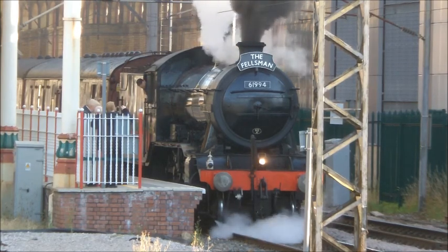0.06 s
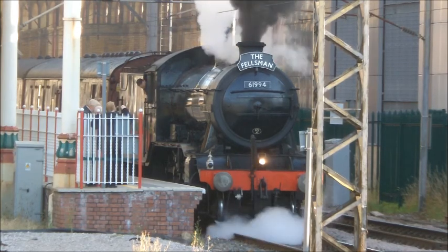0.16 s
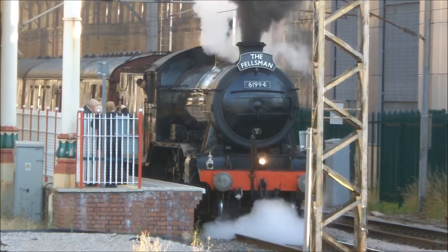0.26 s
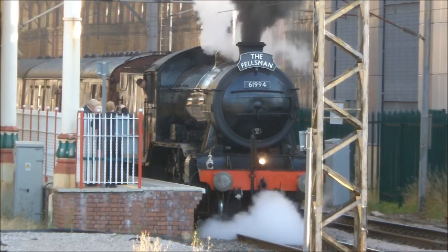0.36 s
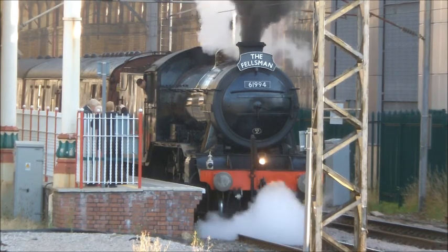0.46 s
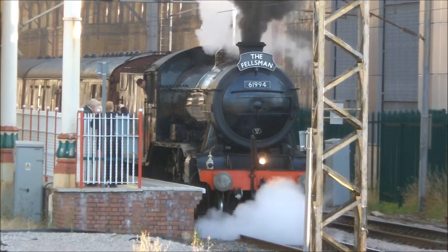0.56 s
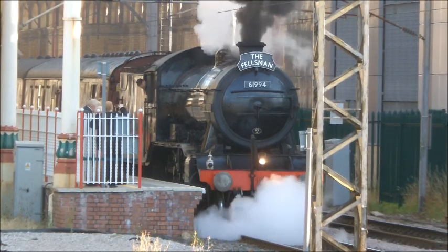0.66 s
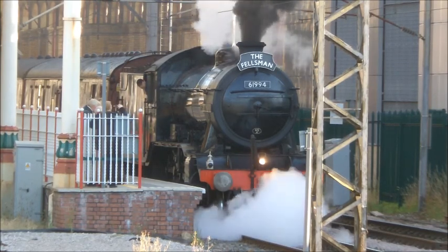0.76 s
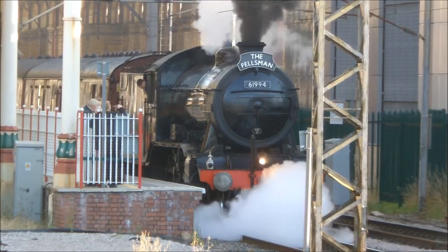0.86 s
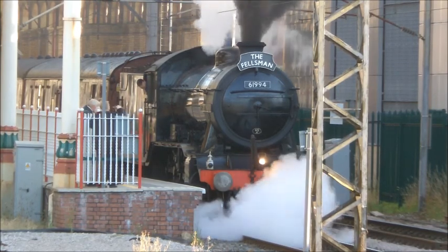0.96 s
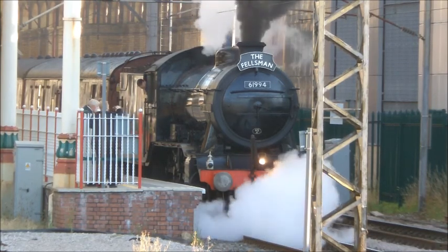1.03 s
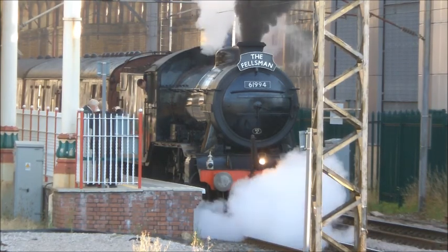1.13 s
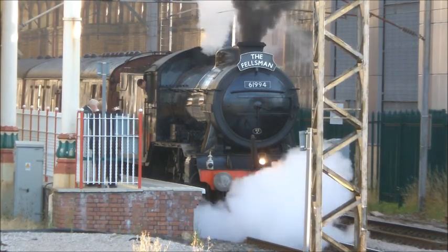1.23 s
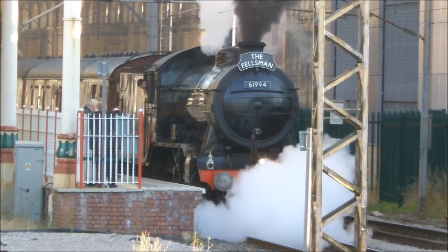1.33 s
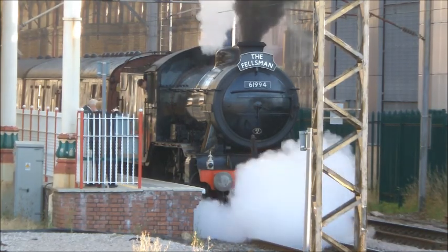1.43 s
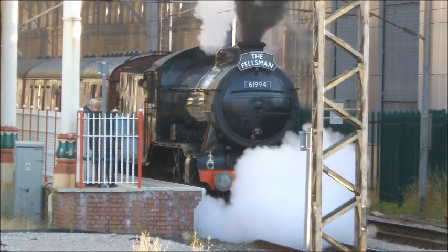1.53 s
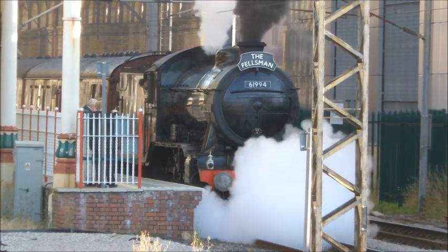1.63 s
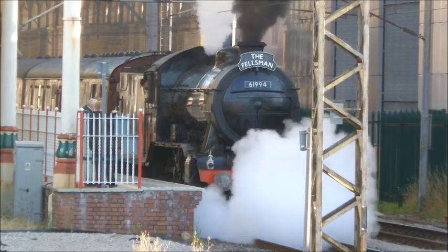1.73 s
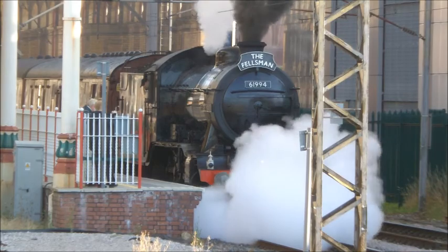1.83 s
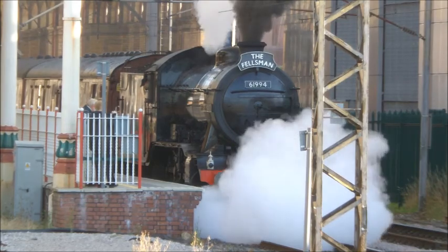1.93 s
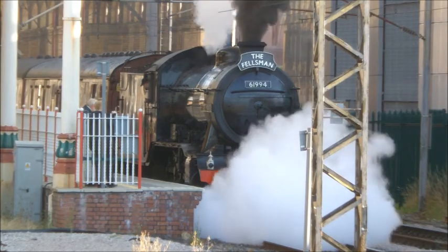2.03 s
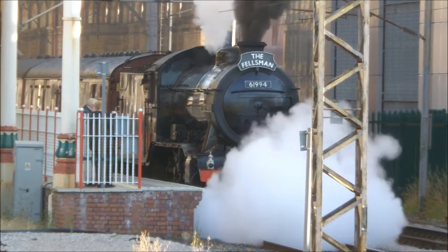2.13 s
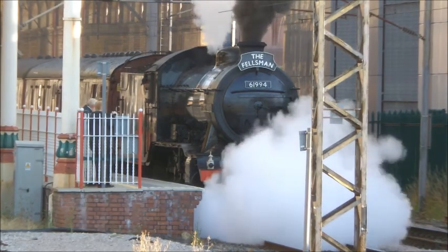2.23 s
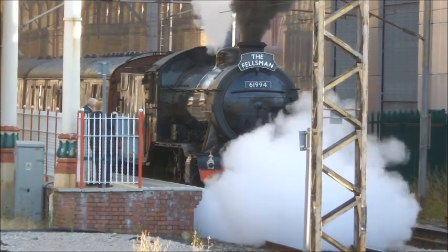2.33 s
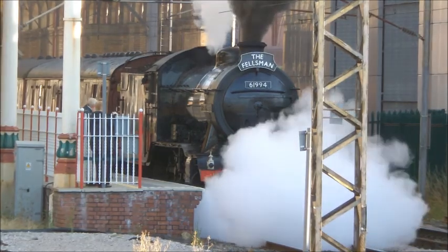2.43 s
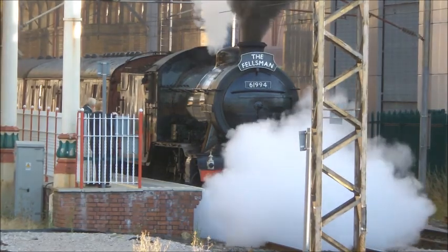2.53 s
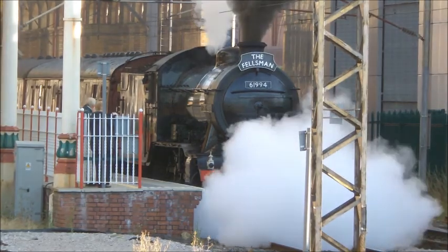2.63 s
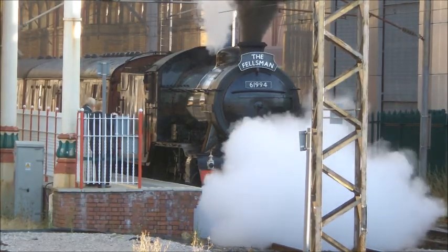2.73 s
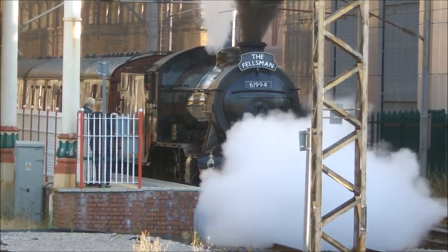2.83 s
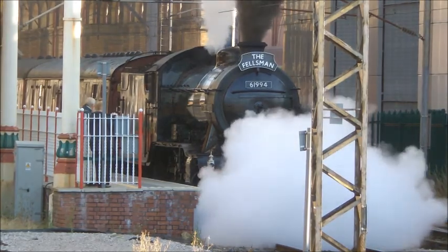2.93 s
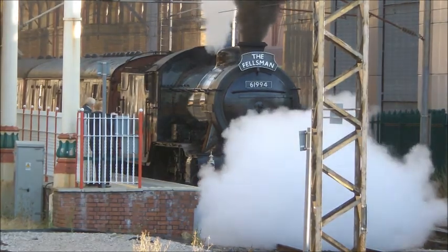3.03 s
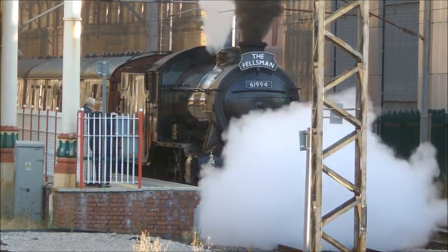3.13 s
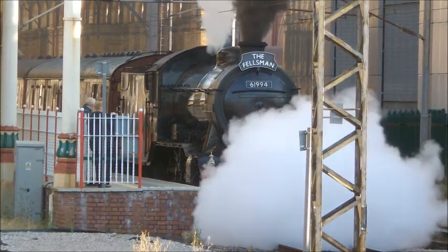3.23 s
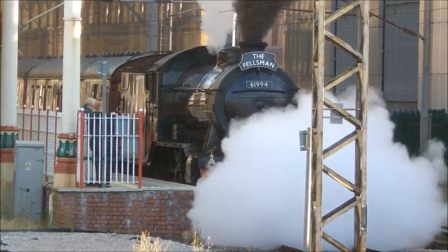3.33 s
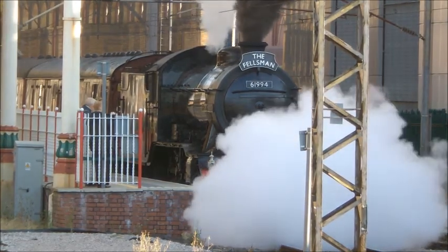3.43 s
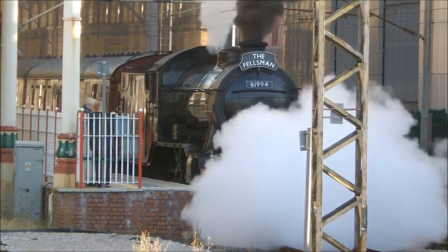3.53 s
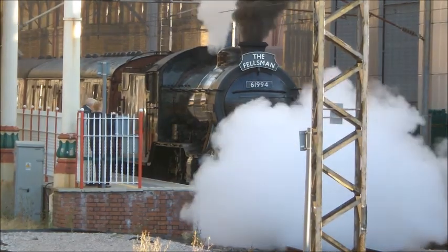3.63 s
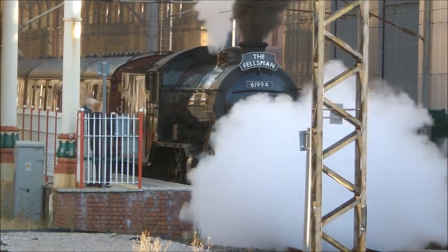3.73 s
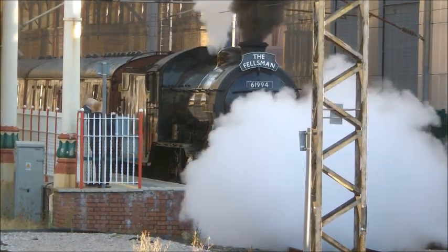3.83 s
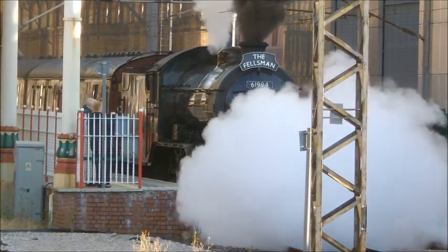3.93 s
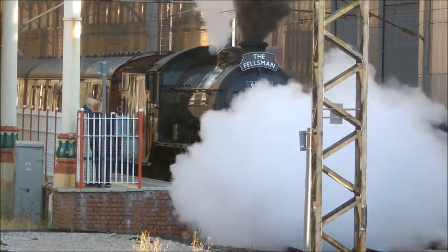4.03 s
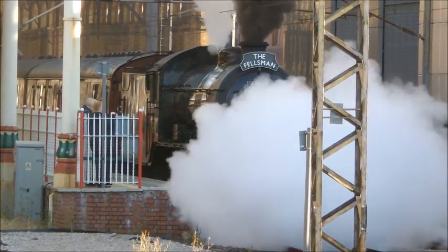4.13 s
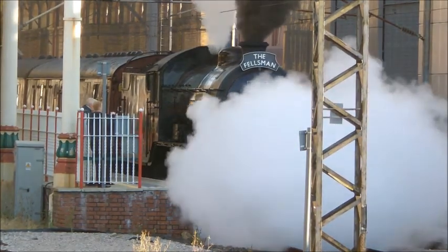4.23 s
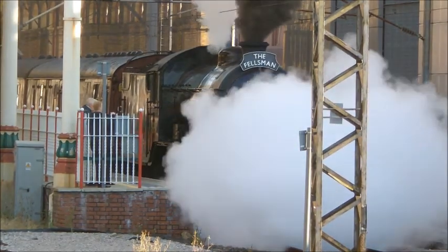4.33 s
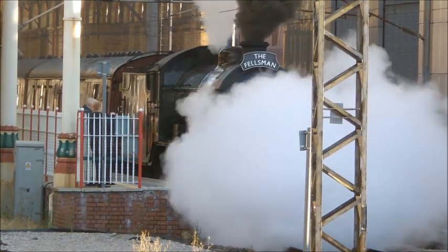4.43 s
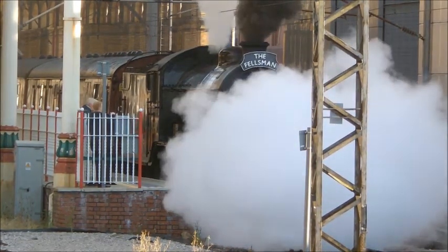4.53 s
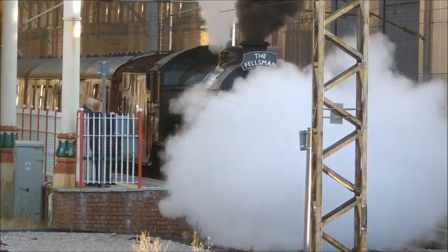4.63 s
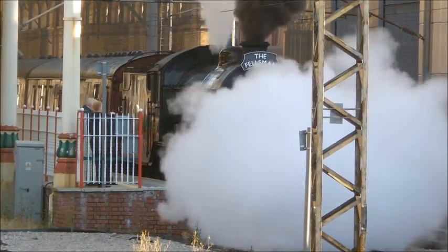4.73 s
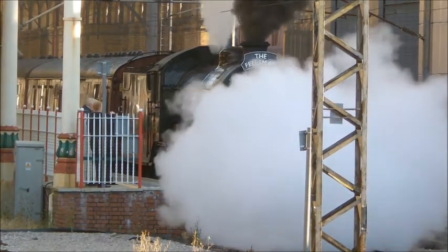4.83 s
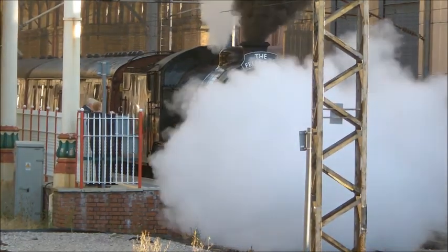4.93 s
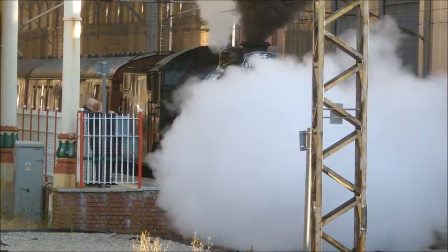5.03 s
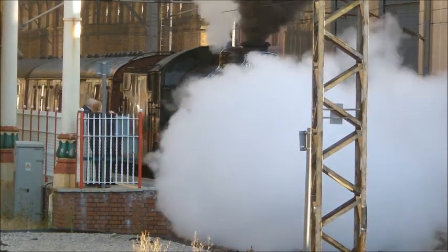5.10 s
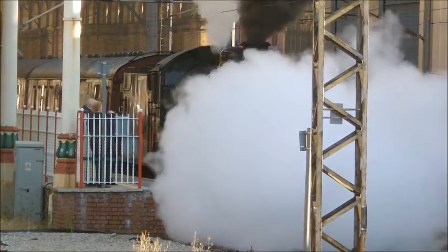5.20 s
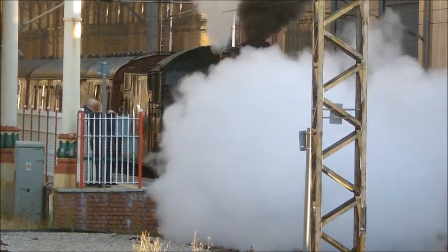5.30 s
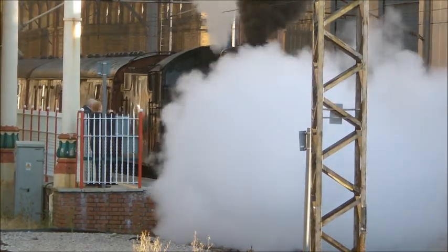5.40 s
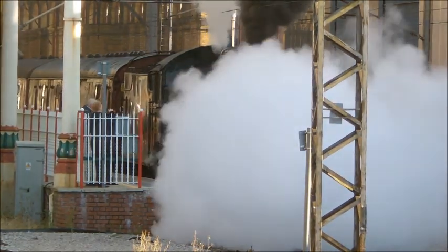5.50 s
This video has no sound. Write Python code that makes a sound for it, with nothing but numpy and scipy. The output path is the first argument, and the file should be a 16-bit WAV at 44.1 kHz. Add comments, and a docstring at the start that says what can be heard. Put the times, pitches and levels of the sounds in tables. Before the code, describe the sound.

Outdoors at a station platform, a standing steam locomotive some way off releases steam from its drain cocks. At 0 s there is a restrained, low breathy roar, easing slightly around 0.3 s. From about 0.6 s it swells fast, strong by 1.2 s and nearly full by 2 s, becoming a dense, bright, turbulent hiss. A very brief extra spit of treble flares near 2.6 s. The hiss continues to 5.5 s, gently surging, with its loudest push around 4.6 s, and does not stop. Faint whistly ridges and shifting hollow colour come from short echoes off brick and ballast. The image narrows during the swell, then opens wider after about 3 s. Beneath, almost masked, are light lumpy wind, slightly stronger late, and two soft low knocks near 3.7 s, a little to the right. The stereo microphone stays fixed, with the extreme top rolled off.

```python
"""A station platform: some way off, a standing steam locomotive opens its cylinder drain cocks.
The jets are stereo noise in seven bands, swelling from a low roar to a loud bright hiss.
Short echoes off ballast and brick comb it; its colour shifts and its width narrows, then opens again.
Beneath lie light wind, made of lumpy low noise, and two soft knocks, made of brief low swings."""
import sys
import numpy as np
from scipy import signal
from scipy.fft import rfft, irfft, next_fast_len
from scipy.io import wavfile

SR = 44100
rng = np.random.default_rng(int(sys.argv[2]) if len(sys.argv) > 2 else 0)


def log_audio(samples):
    """Write samples as a 16-bit WAV file to the path given in sys.argv[1]."""
    # one column per channel
    frames = np.atleast_2d(samples).T
    # limit to full scale, then quantise
    limited = np.clip(frames, -1, 1)
    pcm = np.round(limited * 32767).astype(np.int16)
    wavfile.write(sys.argv[1], SR, pcm)


N = 245195
SIZE = next_fast_len(N)
BIN_HZ = np.maximum(np.arange(SIZE // 2 + 1) * SR / SIZE, 1)
TIME_S = np.arange(N) / SR

# Basic colour of the steam, before resonances and part levels: pitch_hz, density_db (dB per Hz, relative)
STEAM_COLOUR = [(88, -62), (150, -41.5), (247, -36), (406, -28.5), (541, -25), (631, -18), (764, -18.5),
                (1330, -10), (2150, -3.5), (2710, -4.5), (4050, 0), (7910, -7.5), (9760, -2.5), (13300, 15),
                (14600, 15.5)]
# Resonances under the frames: pitch_hz, width_hz, boost_db
FRAME_RESONANCES = [(333, 56, 8), (406.5, 48, 8), (710, 160, 1.5), (1048, 160, 2.5), (1370, 76, 2),
                    (2360, 150, 0), (4100, 40, 1.5), (9050, 3000, 7)]
# Reflections off ballast and brick: delay_s, wander_s, level_db
ECHO_PATHS = [(.0019, 0.000054, -39.5), (.0043, 0.00011, -24), (.0065, 0.00021, -20),
              (.011, 0.000295, -16.5), (.017, 0.0003, -14)]
# Ridges in the hiss: start_s, end_s, pitch_hz, width_hz, gain_db (below zero a dip; flicker is added)
HISS_RIDGES = [(0, 1.1, 694, 200, 3.5), (0, 3.9, 1830, 140, 3.5), (0, 3.1, 3080, 170, -4),
               (0.4, 2.2, 2170, 130, 5), (0.5, 1.9, 4380, 400, 2), (1.3, 3.1, 5040, 260, 3.5),
               (1.4, 2.4, 4800, 230, -1), (1.5, 2.3, 4420, 310, 4.5), (1.7, 2.9, 12000, 800, 4),
               (2.399, 3.5, 9500, 900, 2.5), (2.55, 3.1, 2220, 300, 4), (3.4, 4.5, 7300, 900, 3.5),
               (3.5, 5, 2910, 86.6, 4.5), (4.002, 8, 1380, 130, 3), (4, 4.7, 1660, 50, 6.5),
               (4, 4.8, 3340, 130, 5.5), (4.4, 8.1, 9850, 300, 4.5), (4.5, 5.3, 12600, 700, 3.5),
               (4.9, 5.3, 1093, 500, 3), (4.9, 5.9, 4020, 300, 3.5)]
# Basic stereo width, before its change over time: pitch_hz, side_minus_mid_db
STEREO_WIDTH = [(100, -14), (300, -38), (500, -31), (1000, -19), (1900, -20), (3200, -10), (5000, -13),
                (7000, -2), (9200, -7.5), (11500, -8.5), (14000, -5.5)]
# Crossovers between neighbouring parts of the steam: pitch_hz
PART_EDGES_HZ = [1300, 2600, 4000, 6000, 8100, 10500]
# Rumble, roar, low core, high core, edge, sizzle, top: level_db (at reference flow and treble),
# flow_share (ratio), treble_share (ratio), creep_db_per_s
STEAM_PARTS = [(-51, .35, .05, 0.4), (-41.5, 0.67, 0.041, 0.04), (-39.5, 0.93, .01, 0.04),
               (-37, 1.07, .01, -0.2), (-46, 0.97, 0.38, 0.9), (-42.5, 1.07, 0.93, -0.76),
               (-42, 1.04, 1, 0.4)]
# Swing of the jets, scaled by each part's shares: time_s, core_level_db, treble_above_core_db
JET_FLOW = [(0.0, -50, -7), (0.26, -53.5, -6), (0.62, -50, -6.5), (0.9, -44.5, -6), (1.18, -39, -6.5),
            (1.38, -38.5, -9), (1.64, -36.5, -7.5), (1.8, -35.5, -9), (2.2, -35, -8), (2.5, -34, -6),
            (2.85, -33.5, -5.5), (3.08, -32, -7), (3.3, -33.5, -8), (3.7, -34, -9), (4.21, -33, -7),
            (4.55, -30, -9.5), (4.72, -30, -7), (4.88, -32, -8.5), (5.08, -31, -7), (5.4, -32.5, -4.5),
            (5.56, -31.5, -5.5)]
# Brief treble flares, scaled by each part's treble share: centre_s, half_length_s, lift_db
TREBLE_SPITS = [(1.15, .1, 0.5), (2.575, 0.044, 7), (2.74, 0.039, 1.5)]
# Change of stereo width, scaled by each part's width share: time_s, side_gain_db
WIDTH_OVER_TIME = [(0, 2), (.7, -8), (1.5, -6), (2.7, -6.5), (3.2, -0.5), (3.8, 2), (5.56, 1)]
# How much of the width change each part takes, rumble to top: width_share (ratio)
WIDTH_SHARES = [0.1, 0.56, 0.068, 0.33, .2, 0.63, 2.5]
# Colour of the wind, before a steep low-pass: pitch_hz, density_db (dB per Hz, relative)
WIND_COLOUR = [(12, -40), (20, -9), (92, 1), (135, -3), (199, -22), (260, -12), (340, -45), (570, -120)]
# Steady wind, before its waver and gusts: time_s, level_db
WIND_LEVEL = [(0.0, -87), (1.4, -88), (2.1, -85), (3.5, -85), (4.86, -79.5), (5.56, -80.5)]
# Gusts added to the steady wind gain: centre_s, level_db, half_length_s
WIND_GUSTS = [(4.18, -84, 0.023), (5.41, -79, .05)]
# Soft low knocks, before panning: centre_s, level_db, pitch_hz
KNOCKS = [(3.654, -68, 85), (3.748, -59, 120)]

REFERENCE_FLOW_DB, REFERENCE_TREBLE_DB = -34, -6
RIDGE_FLICKER = 0.25  # ratio of a ridge's gain that wavers
PORT_LAG_S = 7e-6     # the left port's lead over the right, before the width change scales it
ROLL_OFF_HZ, CUTOFF_HZ = 13700, 14500


def from_db(db):
    """Turn dB into gain."""
    return 10 ** (np.asarray(db) / 20)


def rms_one(x):
    """Scale to unit rms."""
    return x / np.sqrt(np.mean(x ** 2) + 1e-20)


def in_time(rows):
    """Read the columns of a time curve, sample by sample."""
    times_s, *columns = np.transpose(rows)
    return [np.interp(TIME_S, times_s, column) for column in columns]


def at_hz(points):
    """Read a spectrum table at every bin, along log pitch."""
    pitch_hz, level_db = np.transpose(points)
    return np.interp(np.log(BIN_HZ), np.log(pitch_hz), level_db)


def bump(centre_s, half_length_s):
    """A smooth rise and fall, one at its centre."""
    return np.exp(-((TIME_S - centre_s) / half_length_s) ** 2)


def drift(rate_hz):
    """Slow chance with unit spread: coarse noise through a double one-pole low-pass."""
    step, settle = 40, 4000  # samples per coarse point, coarse points dropped
    pole = np.exp(-2 * np.pi * rate_hz * step / SR)
    noise = rng.standard_normal(N // step + settle + 2)
    slow = signal.lfilter([1], [1, -2 * pole, pole * pole], noise)[settle:]
    slow = rms_one(slow - slow.mean())
    return np.interp(np.arange(N) / step, np.arange(len(slow)), slow)


def echoes(x):
    """Short reflections comb the hiss; their delays slowly lengthen and shorten."""
    out = x.copy()
    for delay_s, wander_s, level_db in ECHO_PATHS:
        read_s = TIME_S - delay_s - wander_s * drift(0.371)
        reflected = np.array([np.interp(read_s, TIME_S, channel) for channel in x])
        out += from_db(level_db) * reflected
    return out


def ridges(x):
    """Whistly ridges and dips: narrow bands lifted or sunk, flickering while they last."""
    spectrum, out = rfft(x, SIZE), x.copy()
    for start_s, end_s, pitch_hz, width_hz, gain_db in HISS_RIDGES:
        bell = np.exp(-(1.68 * (BIN_HZ - pitch_hz) / width_hz) ** 2)
        band = irfft(spectrum * bell, SIZE)[:, :N]
        progress = np.clip((TIME_S - start_s) / (end_s - start_s), 0, 1)
        presence = np.sin(np.pi * progress) ** 0.26
        flicker = 1 + RIDGE_FLICKER * drift(2.4)
        out += band * (from_db(gain_db * presence * flicker) - 1)
    return out


def patches(spectrum, slow_db, fast_db, count):
    """Overlapping bands swell and sink as eddies pass, neighbours partly in step, the treble most."""
    centres_hz = np.linspace(200, 15000, count)
    slow = [drift(1.9) for _ in range(count + 1)]
    out = 0
    for k, peak in enumerate(np.eye(count)):
        triangle = np.interp(BIN_HZ, centres_hz, peak)
        band = irfft(spectrum * triangle, SIZE)[:, :N]
        depth = 0.74 + centres_hz[k] / 9000
        swell = slow[k] + 0.71 * slow[k + 1]  # the next band's drift is shared
        out = out + band * from_db(depth * (slow_db * swell + fast_db * drift(20)))
    return out


def part_levels():
    """Each part follows flow and treble by its own shares, with a slow steady creep; dB over time."""
    flow_db, treble_db = in_time(JET_FLOW)
    for centre_s, half_length_s, lift_db in TREBLE_SPITS:
        treble_db = treble_db + lift_db * bump(centre_s, half_length_s)
    flow_swing_db = flow_db - REFERENCE_FLOW_DB
    treble_swing_db = treble_db - REFERENCE_TREBLE_DB
    from_middle_s = TIME_S - TIME_S.mean()
    return [level_db + flow_share * flow_swing_db + treble_share * treble_swing_db + creep * from_middle_s
            for level_db, flow_share, treble_share, creep in STEAM_PARTS]


def steam():
    """Turbulent jet noise, combed, coloured and played part by part."""
    colour_db = at_hz(STEAM_COLOUR)
    for pitch_hz, width_hz, boost_db in FRAME_RESONANCES:
        colour_db = colour_db + boost_db / (1 + (2 * (BIN_HZ - pitch_hz) / width_hz) ** 2)
    noise = ridges(echoes(rng.standard_normal((2, N))))
    mid, side = rfft(noise, SIZE) * from_db(colour_db)
    # a quarter-turned side signal that rises with pitch puts the left port slightly ahead
    lead = 1j * np.pi * BIN_HZ * PORT_LAG_S * mid
    side = side * from_db(at_hz(STEREO_WIDTH)) + lead
    jet = rfft(patches(np.array([mid, side]), slow_db=0.64, fast_db=-0.27, count=30), SIZE)

    # soft steps in log pitch share the spectrum out among the parts
    above = [1] + [1 / (1 + (edge_hz / BIN_HZ) ** 16) for edge_hz in PART_EDGES_HZ] + [0]
    side_gain_db, = in_time(WIDTH_OVER_TIME)
    out = 0
    for level_db, share, lower, upper in zip(part_levels(), WIDTH_SHARES, above, above[1:]):
        mid, side = irfft(jet * (lower - upper), SIZE)[:, :N]
        side = side * from_db(share * side_gain_db)  # the width narrows, then opens again, the top most
        gain = from_db(level_db) / np.std(mid)
        out = out + gain * np.array([mid + side, mid - side])
    return out


def wind():
    """Lumpy low noise, partly its own on each port, with a few short gusts."""
    steep = 1 / (1 + (BIN_HZ / 260) ** 6)
    spectrum = rfft(rng.standard_normal((3, N)), SIZE) * from_db(at_hz(WIND_COLOUR)) * steep
    shared, left, right = irfft(spectrum, SIZE)[:, :N]
    air = rms_one(np.array([0.96 * shared + 0.62 * left, 0.88 * shared + 0.82 * right]))
    level_db, = in_time(WIND_LEVEL)
    steady = from_db(level_db + 1.0 * drift(5.6))
    gusts = sum(from_db(gust_db) * bump(centre_s, half_length_s)
                for centre_s, gust_db, half_length_s in WIND_GUSTS)
    return air * (steady + gusts)


def knocks():
    """Each knock is about one cycle of a low swing, stronger on the right."""
    out = 0
    for centre_s, level_db, pitch_hz in KNOCKS:
        swing = np.sin(2 * np.pi * pitch_hz * (centre_s - TIME_S))
        out = out + from_db(level_db) * bump(centre_s, 1 / (1.5 * pitch_hz)) * swing
    return out * from_db([[-4], [2.5]])  # left, right


def scene():
    """Steam, leaning a hair to the right, over wind and low knocks."""
    return steam() * from_db([[-.1], [.1]]) + wind() + knocks()


def record(dry):
    """The microphone fades at the very top, then a steeper filter cuts the top."""
    fade = signal.butter(10, ROLL_OFF_HZ, fs=SR, output="sos")
    cut = signal.ellip(14, .3, 75, CUTOFF_HZ, fs=SR, output="sos")
    return signal.sosfilt(cut, signal.sosfilt(fade, dry))


dry = scene()
out = record(dry)
log_audio(out)
```